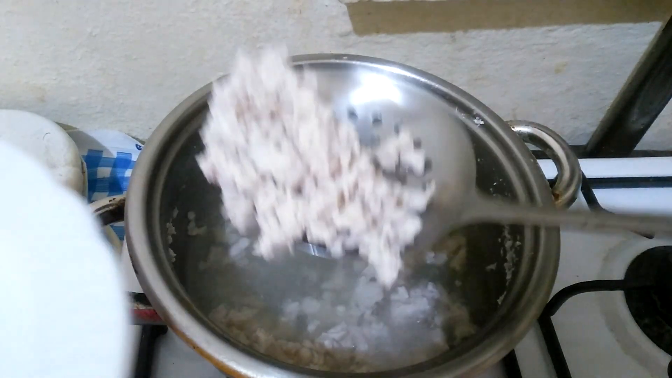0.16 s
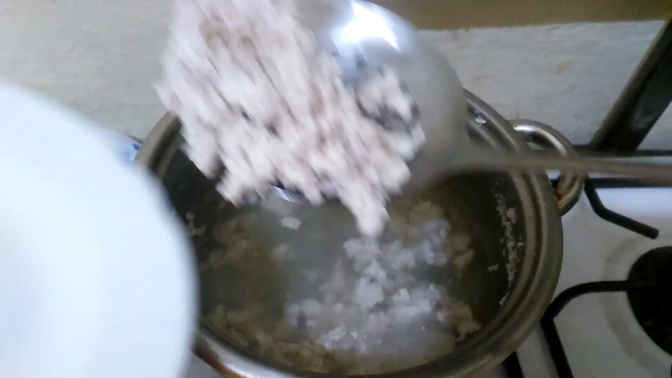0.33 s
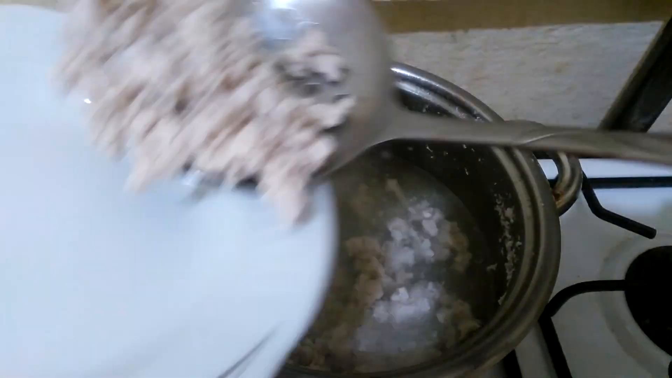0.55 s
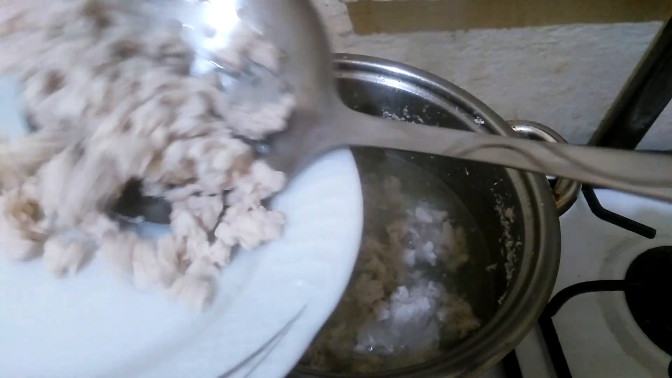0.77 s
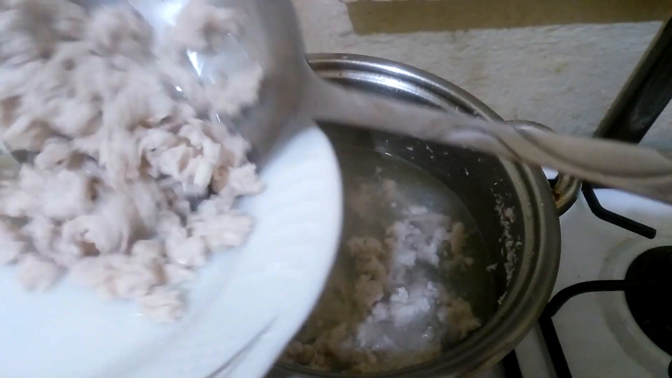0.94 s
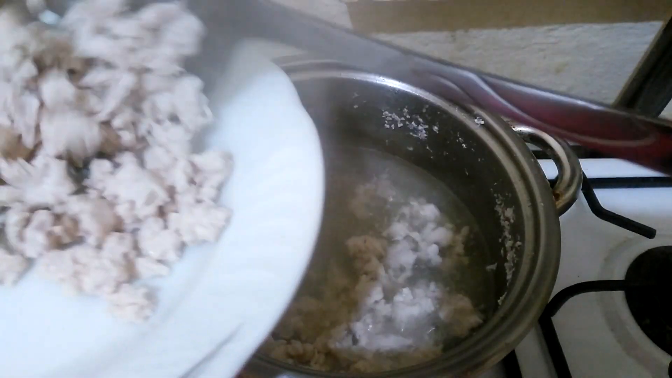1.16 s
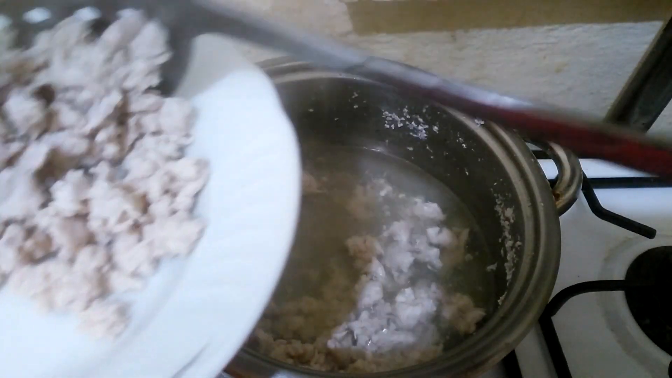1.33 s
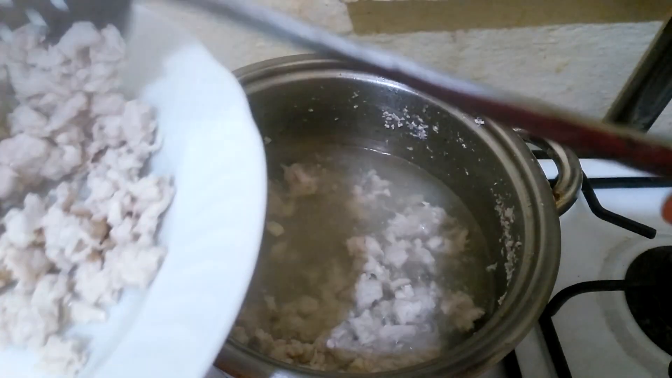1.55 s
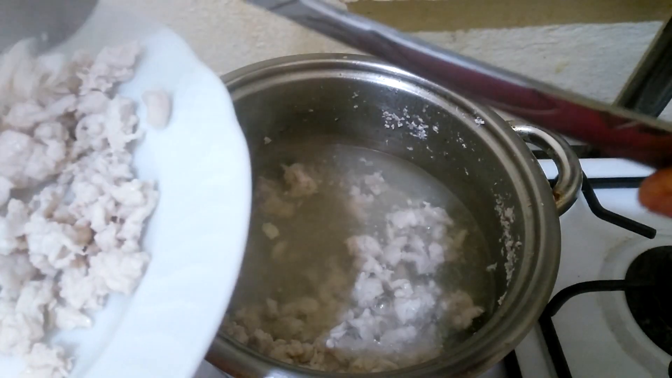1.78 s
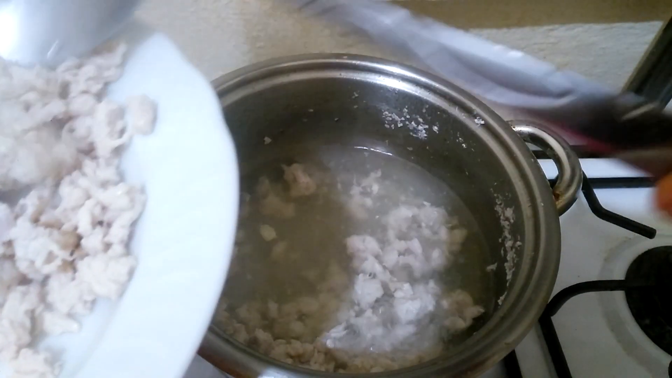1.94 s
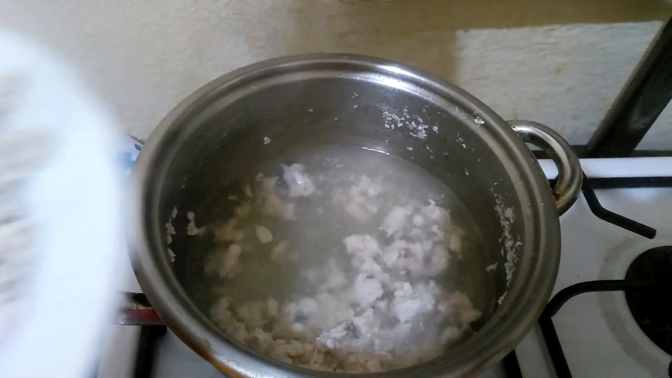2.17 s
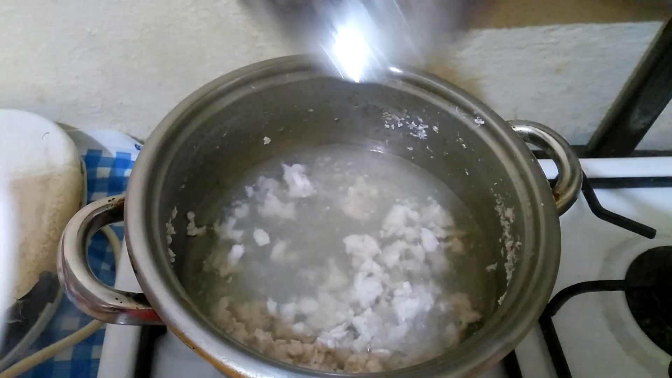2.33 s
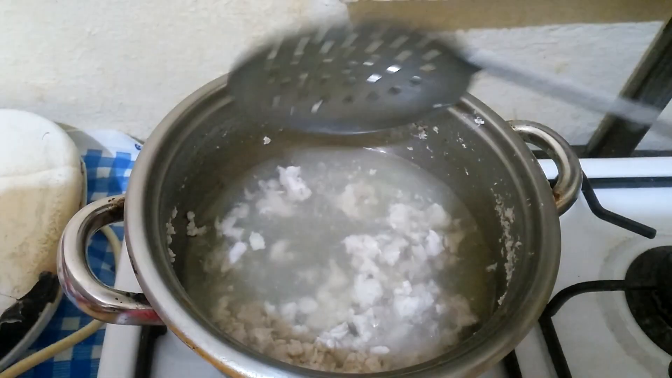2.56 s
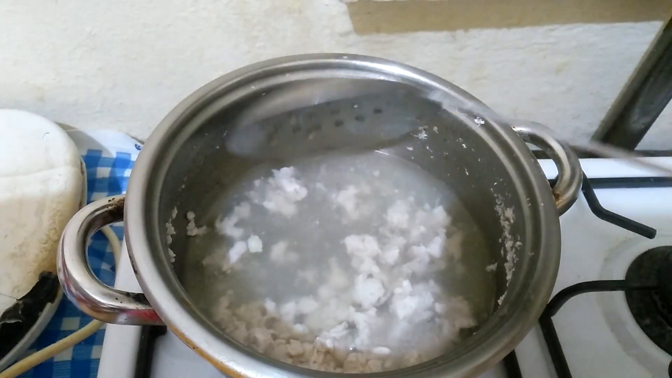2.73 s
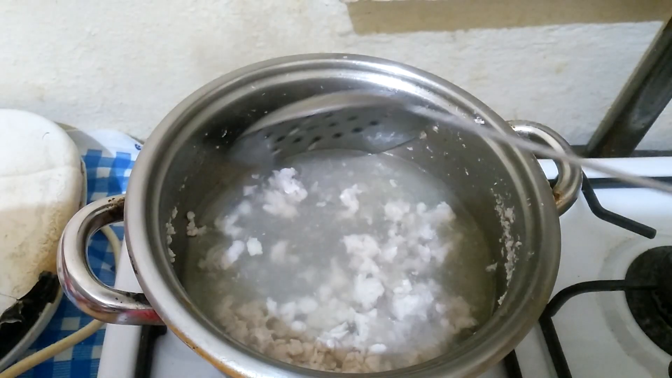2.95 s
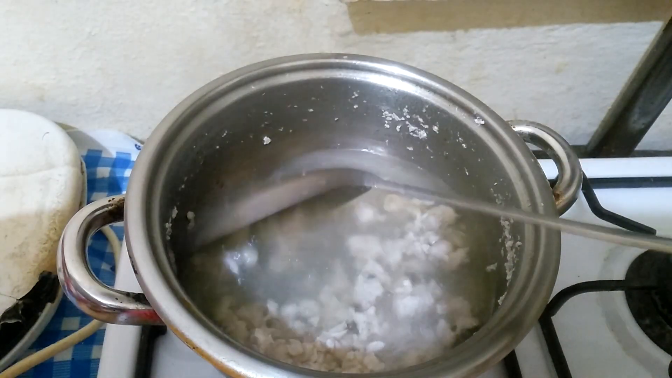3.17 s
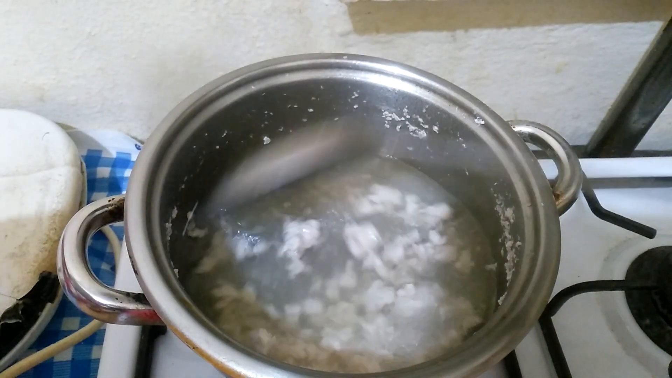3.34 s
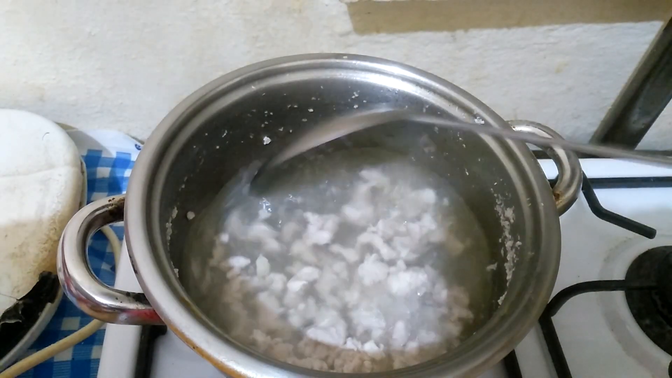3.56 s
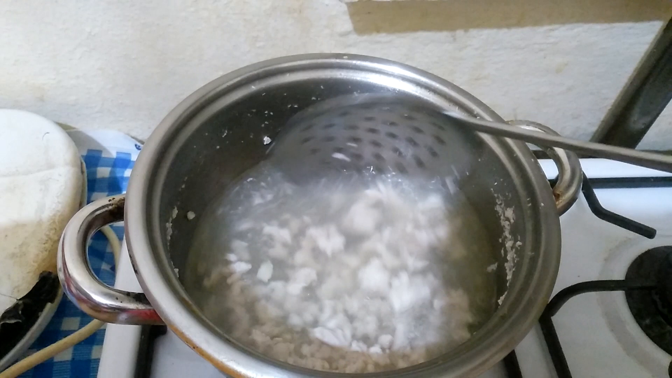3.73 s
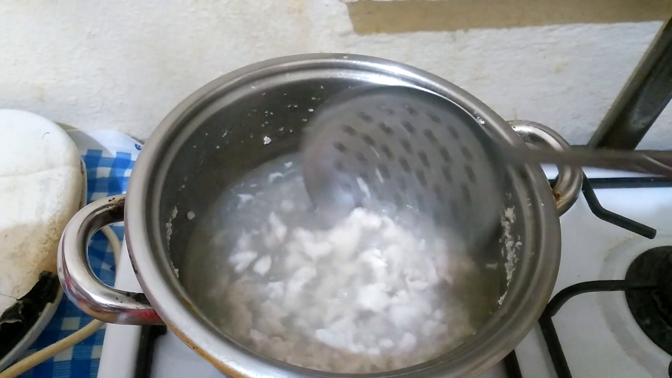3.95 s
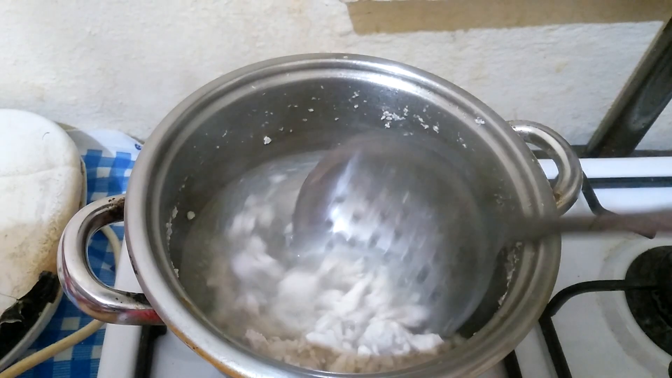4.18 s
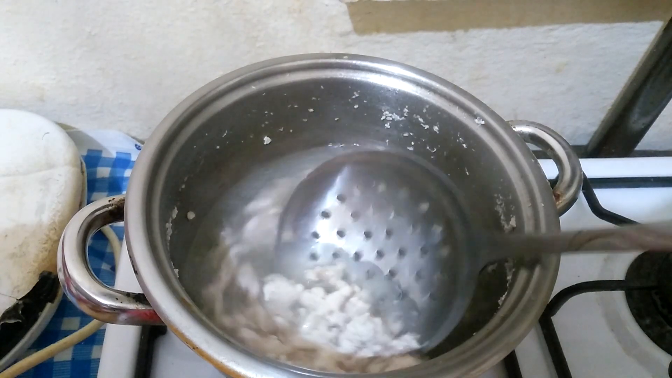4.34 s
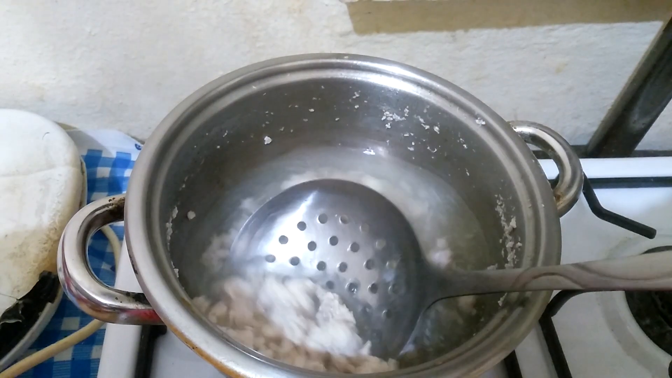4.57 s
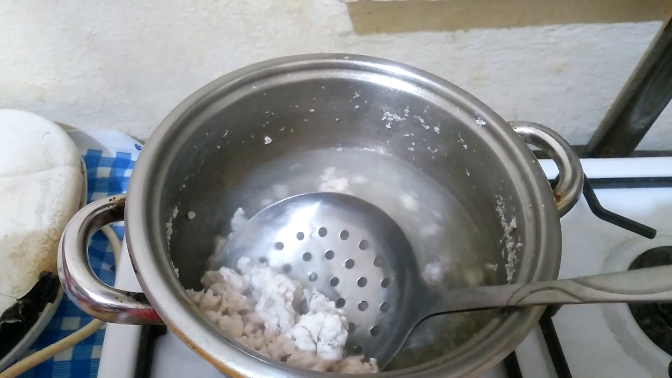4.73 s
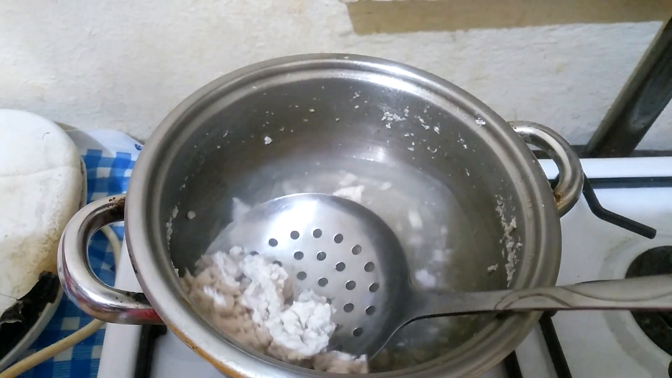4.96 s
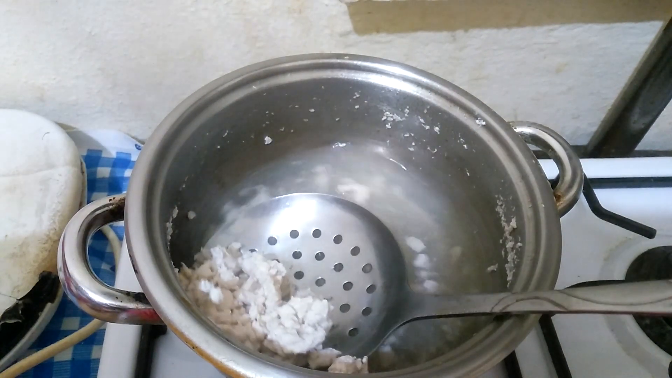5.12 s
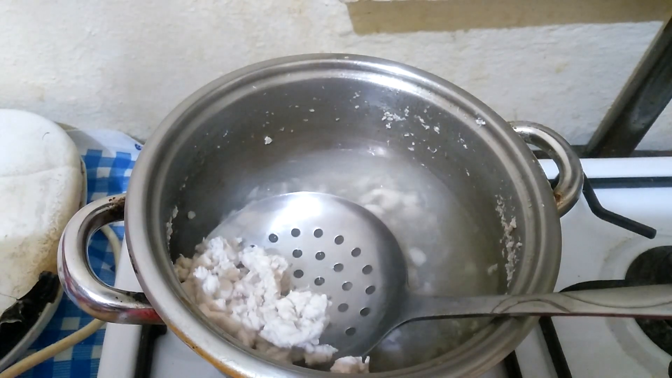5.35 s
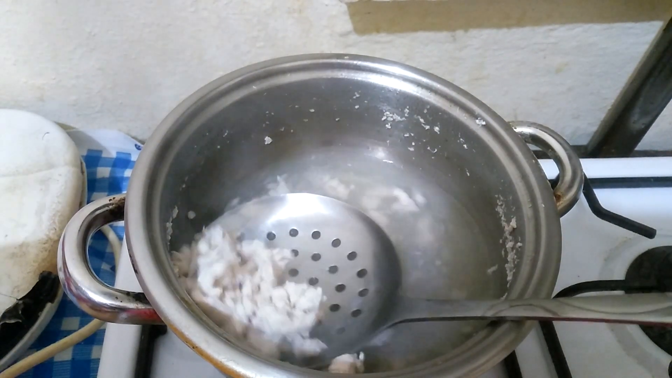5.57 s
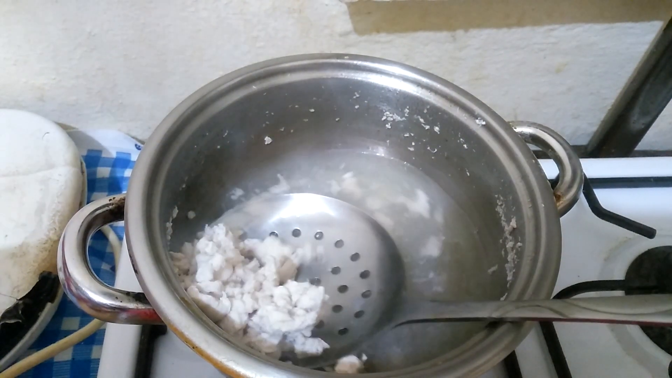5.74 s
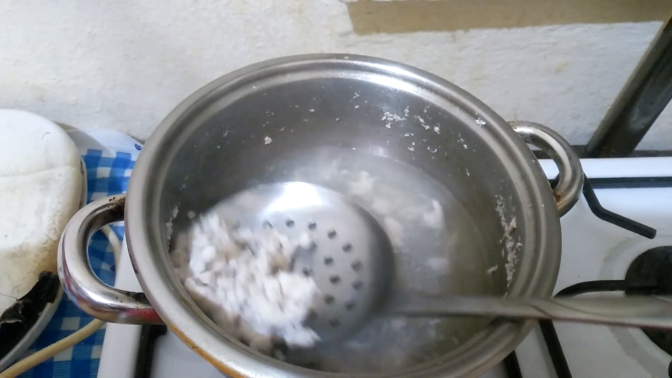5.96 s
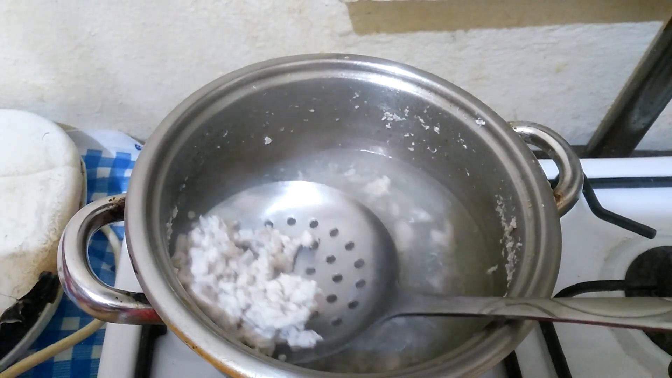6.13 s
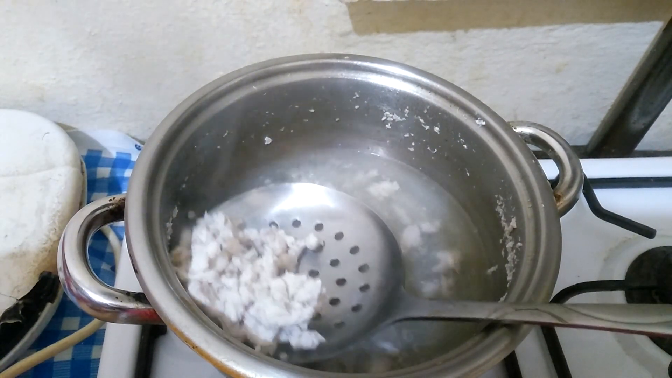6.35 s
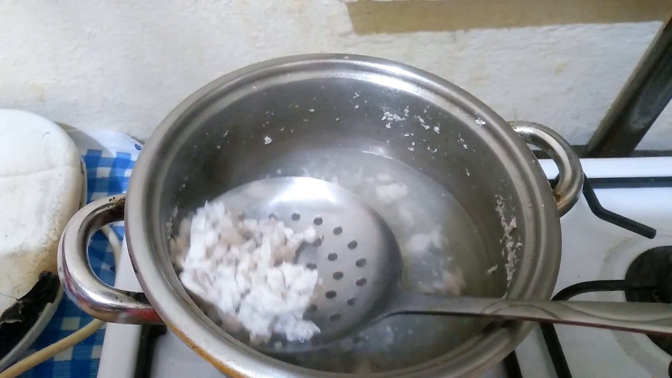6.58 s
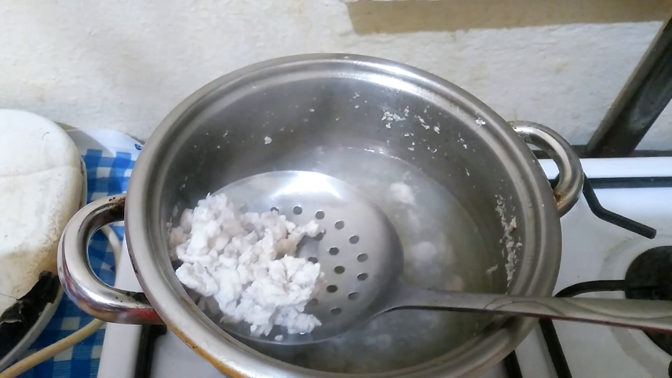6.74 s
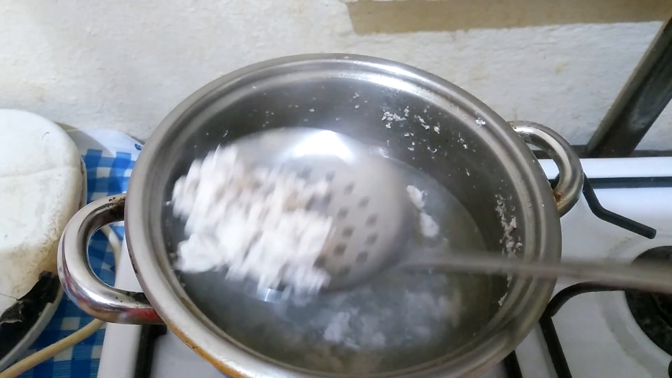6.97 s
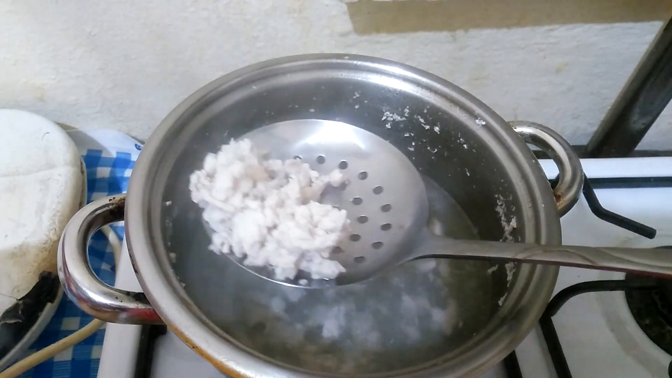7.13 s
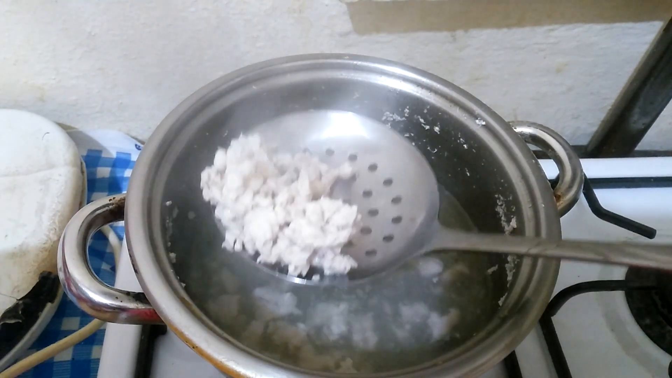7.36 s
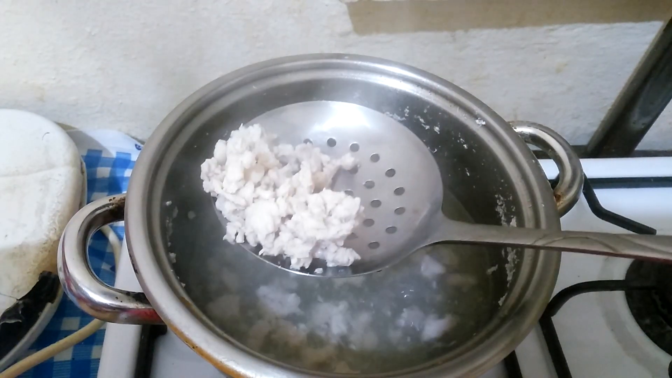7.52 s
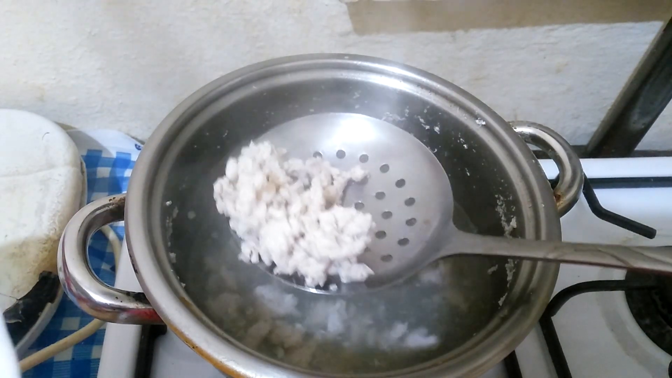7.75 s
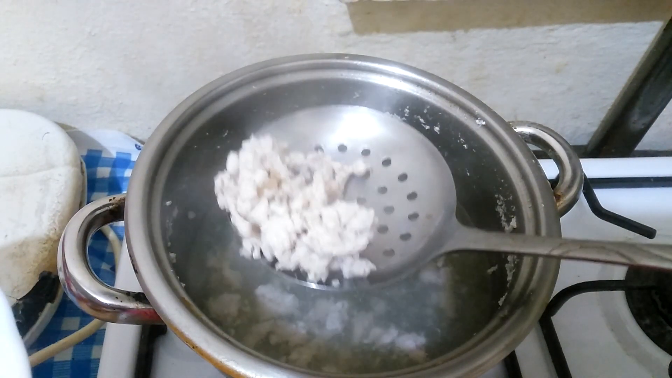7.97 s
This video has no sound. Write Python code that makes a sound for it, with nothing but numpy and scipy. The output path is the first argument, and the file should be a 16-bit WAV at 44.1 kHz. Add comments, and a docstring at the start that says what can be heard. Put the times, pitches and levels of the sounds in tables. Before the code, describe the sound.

Wet food is tipped onto a plate with one hard china clack and soft sticky crackle. After a quieter gap, the metal skimmer rings against a pot, squeals and scrapes round the wall, swishes through water, thuds the pot, rasps along the bottom and ticks on the rim. It rises trickling into the pot. Near microphone, short bright kitchen reflections, faint hum, room hush and hand rumble.

```python
"""Steel skimmer, plate and pot of water

A steel skimmer is knocked empty on a china plate, then clinks on the wall of a steel pot, scrapes round it,
stirs the water, rests on the rim and comes up dripping. Blows are noise bursts plus decaying modes; scrapes are
random slips through resonances; water is rising sine bubbles; wet food crackles by ringing clicks.
A small hard kitchen reflects them over thumps, room air, a hollow hush, a low hum and handling rumble."""
import sys
import numpy as np
from scipy import signal
from scipy.fft import rfft, irfft
from scipy.io import wavfile
from scipy.ndimage import uniform_filter1d

SR = 44100
rng = np.random.default_rng(int(sys.argv[2]) if len(sys.argv) > 2 else 0)


def generate_wav(signal):
    """Clip the signal to [-1, 1] and save it as 16-bit WAV at the path in sys.argv[1]."""
    frames = np.transpose(np.atleast_2d(signal))
    scaled = np.clip(frames, -1, 1) * 32767
    pcm = np.round(scaled).astype(np.int16)
    wavfile.write(sys.argv[1], SR, pcm)


N = 357210
TIME = np.arange(N) / SR


def from_db(db):
    """Decibels to gain."""
    return 10 ** (np.asarray(db) / 20)


def rms_one(x):
    """Scale to rms 1."""
    return x / np.sqrt(np.mean(x ** 2) + 1e-20)


def unit_energy(x):
    """Scale to energy 1."""
    return x / np.sqrt(np.sum(x ** 2) + 1e-20)


def band(x, low_hz, high_hz, order=2):
    """Causal band-pass."""
    edges_hz = [low_hz, min(high_hz, .48 * SR)]
    return signal.sosfilt(signal.butter(order, edges_hz, "band", fs=SR, output="sos"), x + 1e-18)


def level(rows):
    """Gain over time from (t/s, level/dB) rows, held beyond both ends."""
    return from_db(np.interp(TIME, *np.transpose(rows)))


def strokes(rows, fade_s):
    """Gain over time of strokes that fade in, grow or slacken evenly in dB, and fade out."""
    gain = np.zeros(N)
    for start_s, end_s, level_db, change_db, *_ in rows:
        fade = np.clip(np.minimum(TIME - start_s, end_s - TIME) / fade_s, 0, 1)
        gain += fade * from_db(level_db + np.interp(TIME, [start_s, end_s], [0, change_db]))
    return gain


def swells(events, rise_db_per_s, fall_db_per_s):
    """Gain over time of (t/s, level/dB) crests, each building up and dying away; powers add."""
    t = TIME[::32]
    power = 0
    for crest_s, crest_db in events:
        drop_db = np.maximum((crest_s - t) * rise_db_per_s, (t - crest_s) * fall_db_per_s)
        power = power + from_db(crest_db - drop_db) ** 2
    return np.interp(TIME, t, np.sqrt(power + 1e-20))


def at_hz(points, hz):
    """Read a table on a log-frequency axis."""
    known_hz, values = np.transpose(points)
    return np.interp(np.log(hz + 1e-3), np.log(known_hz), values)


def colour(x, spectrum):
    """Shape a steady sound by a spectrum that falls away below its first point; rms 1."""
    hz = np.arange(N // 2 + 1) * SR / N
    low_cut = np.minimum(hz / spectrum[0][0], 1) ** 2
    return rms_one(irfft(rfft(x) * from_db(at_hz(spectrum, hz)) * low_cut, N))


def drift(knots_per_s, size=N):
    """Random knots joined by straight lines; rms 1."""
    knots = rng.standard_normal(4000)
    return rms_one(np.interp(TIME[:size] * knots_per_s, np.arange(len(knots)), knots))


def grains(per_s, spread_db):
    """Random clicks of uneven size and either sign."""
    out, draw = np.zeros(N), rng.random(N) * SR / per_s
    hit = draw < 1
    luck = 2 * draw[hit] - 1
    size_db = spread_db * np.minimum(-np.log(np.abs(luck)), 4)
    out[hit] = np.sign(luck) * from_db(size_db)
    return out


def resonate(x, hz, width_hz):
    """One resonance with gain 1 on top."""
    r = np.exp(-np.pi * width_hz / SR)
    zeros = np.array([1, 0, -1]) * (1 - r * r) / 2
    return signal.lfilter(zeros, [1, -2 * r * np.cos(2 * np.pi * hz / SR), r * r], x + 1e-18)


def gliding(x, hz, width_hz):
    """A resonance whose centre moves in time; gain 1 on top."""
    turn, r = np.exp(2j * np.pi * np.cumsum(hz) / SR), np.exp(-np.pi * width_hz / SR)
    return 2 * np.real(turn * signal.lfilter([1 - r], [1, -r], x / turn + 1e-18))


def add(out, s, sound):
    """Mix a sound in at a moment."""
    start = max(int(s * SR), 0)
    out[start:start + len(sound)] += sound[:N - start]


def bubble(t, hz, level_db, cycles, glide):
    """A sine that falls 60 dB in the given cycles and rises in pitch as it dies."""
    age = t * hz / cycles
    return from_db(level_db - 60 * age) * np.sin(2 * np.pi * hz * t * (1 + glide * age))


# edges of the four registers of a blow: f/Hz
REGISTER_EDGES = [300, 1080, 3000, 7000, 17000]


def blows(events, modes, gain_db, crack_db, crack_t60, clang_db, clang_t60, rise_s, free_db, choke_s, broad_db):
    """Each blow is a crack, a clang (a longer noise burst) and the ring of the strong modes; t60 in s."""
    out, t = np.zeros(N), np.arange(SR // 4) / SR
    hz, mode_db, t60 = np.transpose(modes)[:, :, None]
    # ring choked during contact, plus a free part
    choke = np.exp(-t / choke_s) + from_db(free_db)
    burst_t60 = np.array([[crack_t60], [clang_t60]])
    for s, level_db, *shares_db in events:
        # struck spot sets how strongly each mode answers
        strength = from_db(mode_db + 2 * rng.standard_normal(hz.shape))
        tones = np.sin(2 * np.pi * (hz * t + rng.random(hz.shape)))
        ring = choke * np.sum(strength * from_db(-60 * t / t60) * tones, axis=0)
        crack, clang = rng.standard_normal((2, len(t))) * from_db(-60 * t / burst_t60)
        burst = from_db(crack_db) * unit_energy(crack) + from_db(clang_db) * unit_energy(clang)
        # burst emphasised around the modes
        body = sum(from_db(db) * resonate(burst, f, 250) for f, db, _ in modes)
        noise = np.linalg.norm(burst) * unit_energy(body + from_db(broad_db) * burst)
        blow = (unit_energy(ring) + noise) * (1 - np.exp(-t / rise_s))
        # hardness and place of contact set the register balance
        balanced = 0
        for share_db, low, high in zip(shares_db, REGISTER_EDGES, REGISTER_EDGES[1:]):
            balanced = balanced + from_db(share_db) * unit_energy(band(blow, low, high, order=4))
        add(out, s, from_db(level_db + gain_db) * unit_energy(balanced))
    return out


# room air: f/Hz, relative level/dB per Hz
AIR_SPECTRUM = [(76, -32), (130, -4), (156, -5), (335, -4), (765, -11.5), (2090, -24), (5730, -30),
                (15100, -36.5), (16000, -46)]


def room_air(level_db=-64):
    """Steady noise with the spectrum of the room's air."""
    return from_db(level_db) * colour(rng.standard_normal(N), AIR_SPECTRUM)


# hush: t/s, centre f/Hz, level/dB
HUSH_PATH = [(0, 870, -62), (2.298, 960, -61.5), (4.201, 753, -68), (8.1, 687.6, -68.5)]


def hollow_hush(width_hz=480, waver_db=.55):
    """Noise through one broad resonance whose pitch and level drift."""
    s, centre_hz, level_db = np.transpose(HUSH_PATH)
    noise = band(rng.standard_normal(N), 150, 1700)
    hush = rms_one(gliding(noise, np.interp(TIME, s, centre_hz), width_hz))
    return hush * from_db(np.interp(TIME, s, level_db) + waver_db * drift(25))


def hum(hz=99, level_db=-64, waver_db=2):
    """Low sine wavering in level and phase."""
    gain = np.sqrt(2) * from_db(level_db + waver_db * drift(4))
    return gain * np.sin(2 * np.pi * hz * TIME + .5 * drift(9))


# rumble: f/Hz, relative level/dB per Hz
RUMBLE_SPECTRUM = [(25, -21.5), (40, -13), (55, 5.5), (85, 0), (115, 0), (160, -17), (220, -11),
                   (320, -27.5), (900, -58)]
# hand on the microphone: t/s, level/dB before gain
HAND_LEVEL = [(0, -51.5), (2.2, -53.5), (3.2, -50), (5, -58.5), (8.1, -58.5)]
# sudden moves of the hand: crest t/s, level/dB before gain
HAND_JOLTS = [(.3, -45), (1.0, -44.5), (3.59, -39), (4.0, -45.5), (4.65, -46.5)]


def handling_rumble(gain_db=-2):
    """The hand moving on the microphone: evened low noise under a steady and a jolting gain."""
    rumble = colour(rng.standard_normal(N), RUMBLE_SPECTRUM)
    rumble = rumble / np.sqrt(uniform_filter1d(rumble ** 2, SR // 8))
    jolts = swells(HAND_JOLTS, rise_db_per_s=180, fall_db_per_s=91)
    return from_db(gain_db) * rumble * np.hypot(level(HAND_LEVEL), jolts)


# wet food disturbed: crest t/s, level/dB
WET_SWELLS = [(0, -74), (.8, -68.5), (2.4, -75), (3.1, -63.5), (4.6, -68), (5.8, -72.5)]


def wet_crackle(crackle_per_s=6000, snaps_per_s=22, snap_t60=.033, snap_db=-5, count=12):
    """Bursting films ring at scattered pitches, lows stronger, with sticky snaps; it dies as food drains."""
    t = np.arange(SR // 10) / SR
    crackle = 0
    for hz in np.geomspace(2400, 14000, count):
        crackle = crackle + resonate(grains(crackle_per_s / count, spread_db=.5), hz, hz / 12) / hz
    snap = band(rng.standard_normal(len(t)), 3500, 9500) * from_db(-60 * t / snap_t60)
    snaps = signal.fftconvolve(grains(snaps_per_s, spread_db=0.0), snap)[:N]
    wet = rms_one(rms_one(crackle) + from_db(snap_db) * rms_one(snaps))
    return wet * swells(WET_SWELLS, rise_db_per_s=38.5, fall_db_per_s=7)


# landing drops and morsels: t/s, f/Hz, level/dB
PLIP_EVENTS = [(0.452, 1037, -45), (.503, 840, -47), (5.83, 2900, -54), (6.701, 2870, -57.5)]


def plips():
    """A trapped bubble rings briefly and rises in pitch."""
    out, t = np.zeros(N), np.arange(SR // 8) / SR
    for s, hz, level_db in PLIP_EVENTS:
        add(out, s, bubble(t, hz, level_db, cycles=90, glide=.033))
    return out


# bowl on plate, with bounces: t/s, level/dB before gain, relative lows, low mids, highs, top/dB
PLATE_BLOWS = [(.572, 4.7, -20, -12, -7.3, -24.5), (.586, -6, -22, -12, -7, -24),
               (.598, -2, -32, -24, -7, -30)]
# plate: f/Hz, relative level/dB, t60/s
PLATE_RING = [(975, -6, .09), (2002, 0, .08), (2049, 0, .085), (3186, -8, .13), (3433, -3, .13),
              (3480, -5, .07), (3700, -11, .08), (4150, -12, .07), (4305, -2, .08), (4385, -2, .09),
              (4484, -2, .09), (4570, -3, .1), (4680, -6, .07), (4802, -9, .08), (5060, -9, .07),
              (5290, -7, .09), (5378, -6, .1), (5450, -5, .1), (5530, -1, .11), (5780, -7, .08),
              (6028, -6, .09), (6756, -9, .1), (6953, -5, .09), (7850, -15, .1), (8166, -17, .09),
              (10010, -22, .12)]


def plate_blows():
    """The bowl lands on china and bounces, exciting a dense set of short modes."""
    return blows(PLATE_BLOWS, PLATE_RING, gain_db=9.5, crack_db=-4.0, crack_t60=.063, clang_db=-14.5,
                 clang_t60=.1, rise_s=.00038, free_db=-11.0, choke_s=.016, broad_db=-16.5)


# light edge taps: t/s, level/dB before gain, relative lows, low mids, highs, top/dB
EDGE_TAPS = [(0.897, -19, -23.5, -12.5, -2.5, -15.5), (1.215, -34.5, -30, -52.5, -1.5, -10)]
# skimmer bowl: f/Hz, relative level/dB, t60/s
BOWL_RING = [(2800, -11, 0.23), (2500, -21, .2), (3000, -13, .18), (3400, -4, 0.07), (3546, 2.5, 0.15),
             (3910, -6, .1), (4370, -2.5, 0.11), (5070, -2, 0.063), (5620, -6, .14), (5400, -2, .13),
             (6330, -7, 0.21), (6850, -9, 0.2), (8400, -13, 0.14), (9100, -6, .14)]


def edge_taps():
    """The skimmer's edge is tapped as it is shaken out and its bowl rings."""
    return blows(EDGE_TAPS, BOWL_RING, gain_db=15.5, crack_db=-1.5, crack_t60=.036, clang_db=-13,
                 clang_t60=.41, rise_s=.0013, free_db=-28, choke_s=.0083, broad_db=-16)


# squeals: start t/s, end t/s, start f/Hz, end f/Hz, level/dB
SQUEAL_EVENTS = [(.99, 1.203, 3730, 3680, -74), (2.957, 3.015, 4595, 4670, -58),
                 (3.016, 3.071, 5380, 5850, -47), (3.07, 3.13, 5990, 5700, -51),
                 (3.164, 3.196, 4830, 4930, -41.5), (3.676, 3.729, 4810, 4880, -44)]


def squeals(jitter_hz=55, rough_db=3):
    """The edge catches; stick and slip locks on to one mode: a rough gliding sine."""
    out = np.zeros(N)
    for start_s, end_s, from_hz, to_hz, level_db in SQUEAL_EVENTS:
        size = max(int((end_s - start_s) * SR), 64)
        hz = np.linspace(from_hz, to_hz, size) + jitter_hz * drift(369, size=size)
        swell = signal.windows.tukey(size, .5) * from_db(level_db + rough_db * drift(218, size=size))
        add(out, start_s, swell * np.sin(2 * np.pi * np.cumsum(hz) / SR))
    return out


# soft bumps through hand and stove: t/s, f/Hz, level/dB before onset swell
SOFT_BUMPS = [(1.288, 116, -36), (1.848, 122.7, -37), (1.919, 115.3, -38.5), (3.562, 81.5, -28),
              (3.567, 206, -42), (5.25, 62.8, -41), (5.988, 95.5, -39)]
# harder knocks swinging the filled pot: t/s, level/dB before mode level
POT_BOOMS = [(3.431, -28), (3.567, -30), (4.122, -36), (5.962, -46.5)]
# deep modes of the filled pot: f/Hz, relative level/dB, t60/s
POT_DEEP_MODES = [(432, 0, 0.16), (390, -1, 0.033), (486, -3, 0.067), (630, -17, .07)]


def thumps(bump_t60=.32, swell_s=.01):
    """Low modes swell for a few cycles and die away."""
    out, t = np.zeros(N), np.arange(SR // 2) / SR
    tones = [(*row, bump_t60) for row in SOFT_BUMPS]
    for s, boom_db in POT_BOOMS:
        tones += [(s, hz, boom_db + mode_db, t60) for hz, mode_db, t60 in POT_DEEP_MODES]
    for s, hz, db, t60 in tones:
        envelope = from_db(db - 60 * t / t60) * (1 - np.exp(-t / swell_s))
        add(out, s, envelope * np.sin(2 * np.pi * hz * t))
    return out


# knocks on pot wall: t/s, level/dB before gain, relative lows, low mids, highs, top/dB
WALL_BLOWS = [(2.871, -19, -14, -25, -6.5, -13), (3.149, -18, -4.5, 2.5, 6, -1),
              (3.428, -25.5, -4, -4.5, 1.5, -40), (3.565, -5.5, -14, -13.5, -10, -19.5)]
# pot wall: f/Hz, relative level/dB, t60/s
WALL_RING = [(430.7, 6, 0.19), (740, 16.5, 0.02), (866, 0, 0.35), (1160, 4, 0.065), (1487, 13, 0.27),
             (1786, 19, 0.16), (2334, 16.5, 0.12), (2390, -11, 0.059), (2430, -2, 0.101), (3240, -18, 0.21),
             (3440, 13, .15), (4060, 4, 0.085), (4515, 9, 0.14), (4400, 6, .13), (5010, 13, 0.087),
             (5100, -13, .1), (5630, 9.5, .11), (6520, 10.5, 0.033), (7130, 2, 0.11), (7700, -15, .08),
             (8340, 10, 0.083), (8300, -17, .1), (8970, 7, 0.033)]


def wall_blows():
    """The skimmer clinks on the steel wall, which rings almost unchoked."""
    return blows(WALL_BLOWS, WALL_RING, gain_db=12.5, crack_db=-5, crack_t60=.01, clang_db=1.5,
                 clang_t60=.071, rise_s=.0014, free_db=31, choke_s=.036, broad_db=-19)


# wall strokes: start t/s, end t/s, relative level/dB, level change/dB, resonance glide/share
SLIDES = [(2.913, 3.15, -42.5, -6.5, -0.041), (3.623, 3.951, -47, 1.5, 0.032),
          (3.944, 4.152, -57.5, 6, -0.035)]
# edge digs in for an instant: t/s, relative level/dB
DIG_INS = [(2.968, -35.5), (3.55, -37.5), (3.945, -44.5)]
# pot and skimmer under the sliding edge: f/Hz, width/Hz, relative level/dB
SLIDE_RING = [(859, 22, 0), (1545, 27, 2), (1680, 20, -9), (1910, 31, -8), (2416, 55, 2), (2830, 55, -0.5),
              (3470, 46, 5), (3840, 47, 0), (4350, 73, 1), (4700, 61, 8), (5800, 190, 0), (5770, 68, -27),
              (6320, 190, -1), (6840, 68, -8), (7400, 210, -7.5), (10060, 120, -9)]


def wall_scrape(slips_per_s=3500, rough_db=2.5, wander_db=3.5, wander=.0091, crowd_db=-9,
                crowd_db_per_octave=-3.0, count=44):
    """The edge slips along the wall; resonances drift, swell and fade as the contact point travels."""
    pressure = strokes(SLIDES, fade_s=.046)
    sliding = np.flatnonzero(pressure)
    span = slice(sliding[0], sliding[-1] + SR // 10)
    pressure = pressure + swells(DIG_INS, rise_db_per_s=815, fall_db_per_s=705)
    slips = rms_one(grains(slips_per_s, spread_db=1.5)) * from_db(rough_db * drift(70)) * pressure
    slips = slips[span]
    # weak high modes shimmer above the strong ones
    crowd_hz = np.linspace(2200, 15500, count) + rng.normal(0, 70, count)
    crowd = [(hz, 75, crowd_db + crowd_db_per_octave * np.log2(hz / 2000)) for hz in crowd_hz]
    travel = []
    for start_s, end_s, _, _, glide in SLIDES:
        travel += [(start_s, -glide / 2), (end_s, glide / 2)]
    bend = 1 + np.interp(TIME[span], *np.transpose(travel))
    rub = 0
    for k, (hz, width_hz, db) in enumerate([*SLIDE_RING, *crowd]):
        centre_hz = hz * (bend + wander * drift(5.8, size=len(slips)))
        gain = (-1) ** k * from_db(db + wander_db * drift(14.87, size=len(slips)))
        rub = rub + gain * gliding(slips, centre_hz, width_hz)
    out = np.zeros(N)
    out[span] = np.std(slips) * rms_one(rub)
    return out


# pushes through the water: crest t/s, level/dB before gain
STIR_PUSHES = [(3.075, -31), (3.11, -30.5), (3.18, -46), (3.7, -35), (3.79, -38.5), (4.61, -40),
               (4.69, -40), (4.82, -57), (5.81, -49)]


def stirred_water(low_hz=500, high_hz=1800, hollow_hz=790, hollow_db=-2, gain_db=-11.0, count=4500):
    """Water pushed through the holes sheds small bubbles that rise in pitch as they die."""
    out, t = np.zeros(N), np.arange(SR // 20) / SR
    for when, size, strength in rng.random((count, 3)):
        hz = low_hz * (high_hz / low_hz) ** size
        add(out, when * N / SR, bubble(t, hz, 26.0 * strength, cycles=26, glide=.22) / np.sqrt(hz))
    # hollow of the pot lifts bubbles near its pitch
    out = out + from_db(hollow_db) * resonate(out, hollow_hz, 210)
    return from_db(gain_db) * rms_one(out) * swells(STIR_PUSHES, rise_db_per_s=235, fall_db_per_s=183)


# handle on rim: t/s, level/dB before gain, relative lows, low mids, highs, top/dB
RIM_BLOWS = [(4.119, -25, -13.5, -15.5, -3.5, -16.5), (4.606, -21, -19.5, -20, -13.5, -23),
             (5.428, -27, -26, -10, -8, -20.5), (5.96, -23.5, -39, -11, -10, -23),
             (6.248, -31, -28.5, -6.5, -6.5, -15)]
# rim: f/Hz, relative level/dB, t60/s
RIM_RING = [(1510, -7, 0.55), (1752, 10, 0.024), (1688, 4, 0.12), (2070, 0.5, 0.28), (2340, -10, 0.13),
            (2726, -2, 0.086), (3630, -0.5, .09), (3720, -15, 0.27), (3770, 0.5, 0.086), (4310, -4.5, 0.23),
            (4650, 2.5, 0.05), (5085, -32.5, 0.28), (5650, -11, 0.1), (6400, -17, 0.082), (7100, 2, 0.021),
            (7880, -8.5, 0.086), (8200, -1.5, 0.051), (7900, -20.5, 0.03), (8800, -1, 0.03),
            (9080, -3.5, 0.058), (9740, -1, 0.046)]


def rim_blows():
    """The handle meets the rim: little crack, mostly clang and ring."""
    return blows(RIM_BLOWS, RIM_RING, gain_db=19, crack_db=-29, crack_t60=.0066, clang_db=-8.5,
                 clang_t60=.18, rise_s=.0008, free_db=-10.5, choke_s=.016, broad_db=3)


# bottom strokes: start t/s, end t/s, level/dB before gain, level change/dB
RASPS = [(4.36, 4.47, -59.5, 7.5), (4.61, 4.76, -44, -5), (4.76, 4.99, -47, -18.5), (5.5, 5.66, -60.5, -6),
         (5.71, 5.94, -57.5, -11)]
# grit: f/Hz, relative level/dB per Hz
GRIT_SPECTRUM = [(650, 10), (850, 4.5), (1200, -20), (1700, 5.5), (2200, -5), (3300, -0.5), (5200, 0),
                 (6300, -4), (9000, -7.5), (15000, -15.5)]


def bottom_scrape(grains_per_s=1100, rough_db=3.0, wander_db=3, gain_db=1, count=17):
    """Under water the edge rasps over grit, which excites short resonances that come and go."""
    grit = grains(grains_per_s, spread_db=5.5) * from_db(rough_db * drift(50))
    rasp = 0
    for k, hz in enumerate(np.linspace(850, 14500, count)):
        rasp = rasp + (-1) ** k * from_db(wander_db * drift(14)) * resonate(grit, hz, 210)
    return from_db(gain_db) * colour(rasp, GRIT_SPECTRUM) * strokes(RASPS, fade_s=.023)


# underwater edge knocks: t/s, level/dB before gain
BOTTOM_KNOCKS = [(4.461, -21.5), (4.7, -26), (4.765, -21), (4.778, -17.5), (4.82, -28), (4.897, -33),
                 (4.912, -36), (4.921, -32.5), (5.007, -31), (5.046, -33), (5.131, -35), (5.414, -41.5),
                 (5.78, -39), (5.81, -41.5), (6.054, -38.5)]
# balance by strength: level/dB before gain, relative lows, low mids, highs, top/dB
KNOCK_BALANCE = [(-40.5, -13, 7, 0.0045, 1), (-34.5, -52, -11.5, 0, -6.5), (-5, -9, -12, 0.01, -29)]
# pot bottom: f/Hz, relative level/dB, t60/s
BOTTOM_RING = [(890, 30, .03), (1585, 5, .1), (1700, 16, .06), (2410, 4, .04), (3460, 4, .03),
               (4030, 8, .025), (4400, 8, .025), (4750, 11, .03), (5300, 10, .03), (5900, 4, .03)]


def bottom_knocks():
    """The edge knocks the bottom under water; strength sets the balance of registers."""
    known_db, *shares_db = np.transpose(KNOCK_BALANCE)
    events = [(s, db, *[np.interp(db, known_db, share) for share in shares_db]) for s, db in BOTTOM_KNOCKS]
    return blows(events, BOTTOM_RING, gain_db=11.5, crack_db=-11, crack_t60=.027, clang_db=-8.0,
                 clang_t60=.067, rise_s=.0003, free_db=4, choke_s=.011, broad_db=5)


# draining water, first level held before: t/s, level/dB before the resonances' lift
DRAIN_LEVEL = [(6.4, -81), (7.4, -68.5), (8.1, -62.5)]


def trickle(per_s=380, spread_db=2.2, cycles=18, db_per_octave=-6, burble_hz=700, burble_db=9,
            patter_hz=2500, patter_db=3, count=24):
    """Water draining from the raised skimmer into the pot: a low burble under a fine high patter."""
    plops = 0
    for hz in np.geomspace(540, 3100, count):
        plop = rms_one(resonate(grains(per_s / count, spread_db), hz, hz / cycles))
        plops = plops + from_db(db_per_octave * np.log2(hz / burble_hz)) * plop
    burble = from_db(burble_db) * resonate(plops, burble_hz, 220)
    patter = from_db(patter_db) * resonate(plops, patter_hz, 700)
    return rms_one(plops + burble + patter) * level(DRAIN_LEVEL)


# falling drops: t/s, level/dB before gain
DROP_EVENTS = [(6.479, -54.5), (6.564, -54.5), (6.774, -64), (7.089, -49), (7.477, -48.5)]


def drips(tick_t60=.065, gain_db=-7):
    """Single drops tick on the water: short decaying bursts of high noise."""
    out, t = np.zeros(N), np.arange(SR // 10) / SR
    for s, level_db in DROP_EVENTS:
        tick = band(rng.standard_normal(len(t)), 3900, 8460)
        add(out, s, from_db(level_db + gain_db - 60 * t / tick_t60) * tick)
    return out


# room decay: f/Hz, t60/s
ROOM_DECAY = [(300, 0.69), (1000, .28), (3000, 0.22), (7000, 0.2138)]


def kitchen(x, wet_db=-10.5, gap_s=.008, linger_db=-24, linger_t60=.45):
    """Reflections of a small hard room, dying sooner in the treble, with a faint slower tail."""
    t, edges = np.arange(SR * 3 // 4) / SR, np.geomspace(150, 19000, 8)
    linger = from_db(linger_db - 60 * t / linger_t60)
    tail = 0
    for low, high in zip(edges, edges[1:]):
        decay = from_db(-60 * t / at_hz(ROOM_DECAY, np.sqrt(low * high))) + linger
        tail = tail + band(rng.standard_normal(len(t)), low, high) * decay
    # ramps in from half to one and a half gaps
    tail = unit_energy(tail * np.clip(t / gap_s - .5, 0, 1))
    return x + from_db(wet_db) * signal.fftconvolve(x, tail)[:N]


def scene():
    """Contacts and water sound in the kitchen; thumps and background are added dry."""
    background = room_air() + hollow_hush() + hum() + handling_rumble()
    knocks = plate_blows() + edge_taps() + wall_blows() + rim_blows() + bottom_knocks()
    scrapes = squeals() + wall_scrape() + bottom_scrape()
    wet = wet_crackle() + plips() + stirred_water() + trickle() + drips()
    return (kitchen(knocks + scrapes + wet) + thumps() + background)[None]


def record(dry, cutoff_hz=15700):
    """Steep low-pass: .1 dB ripple, 80 dB rejection."""
    return signal.sosfilt(signal.ellip(10, .1, 80, cutoff_hz, fs=SR, output="sos"), dry)


dry = scene()
out = record(dry)
generate_wav(out)
```